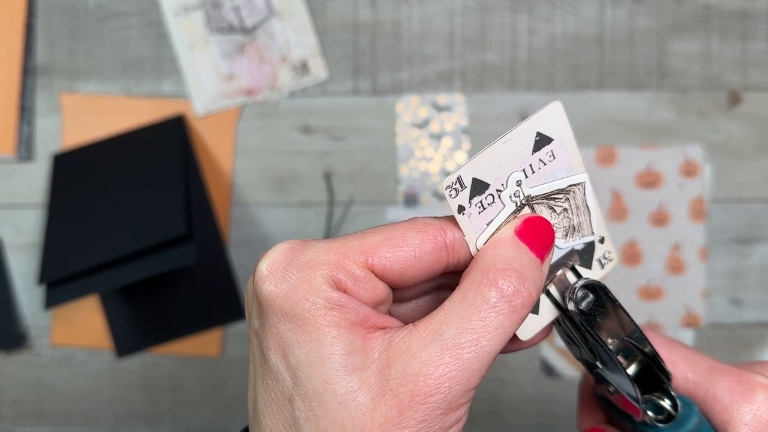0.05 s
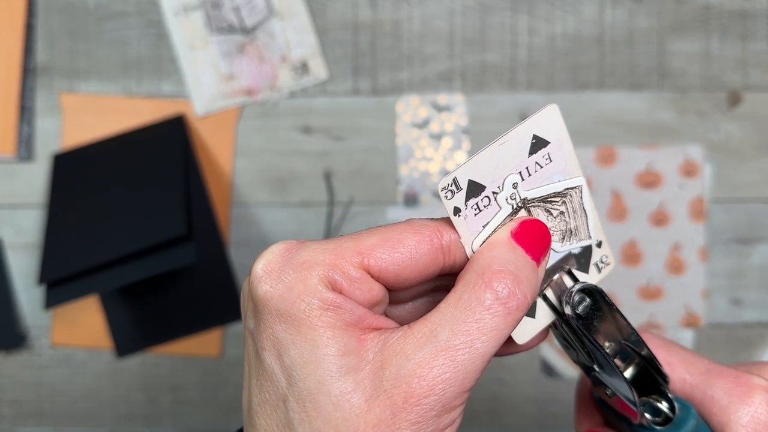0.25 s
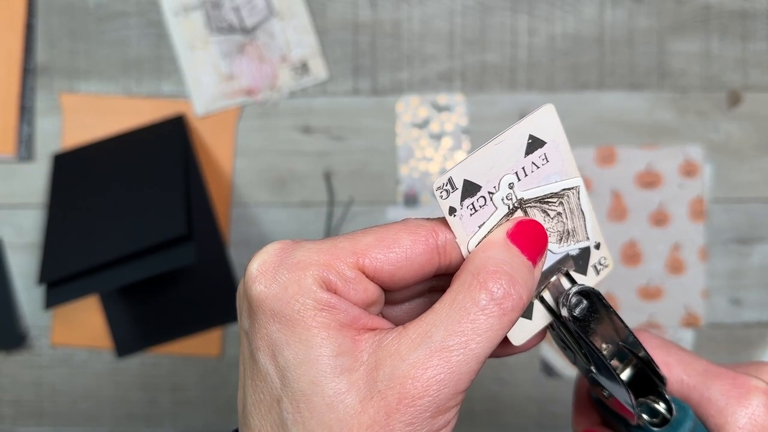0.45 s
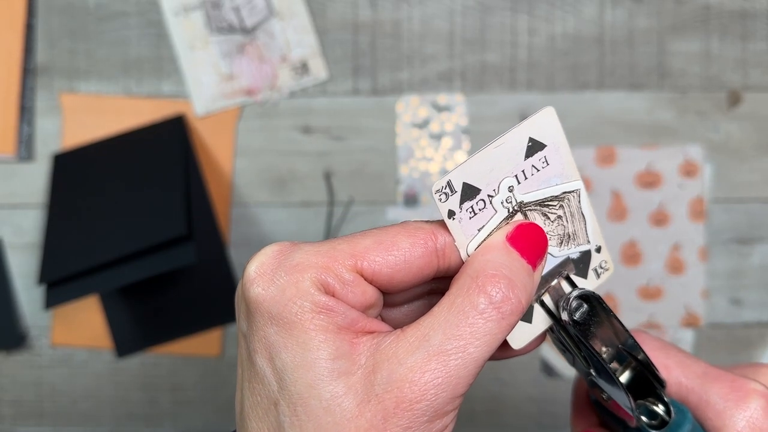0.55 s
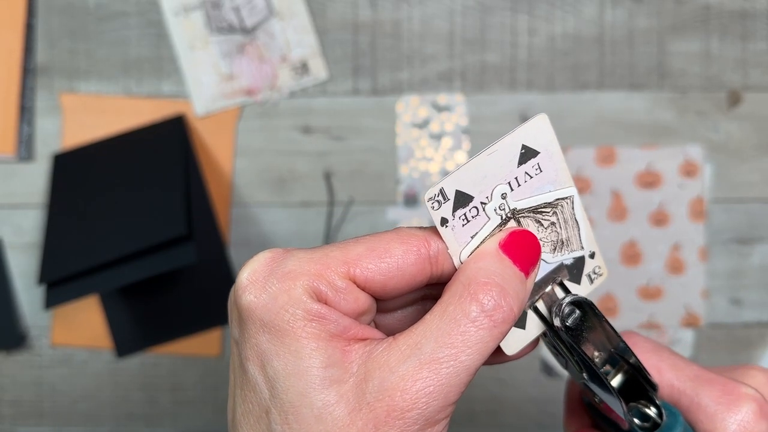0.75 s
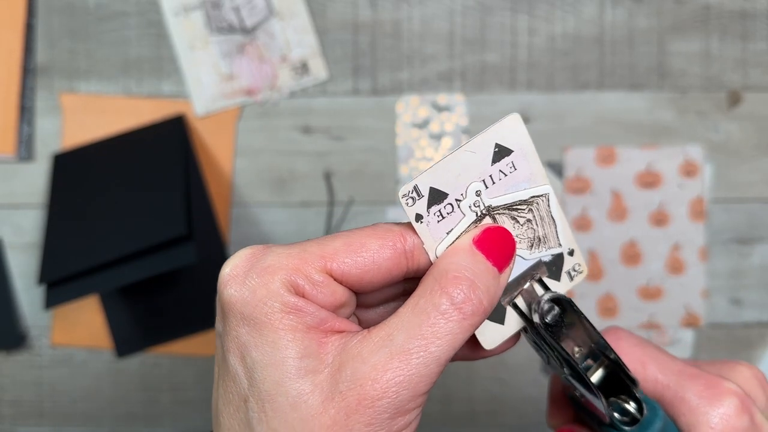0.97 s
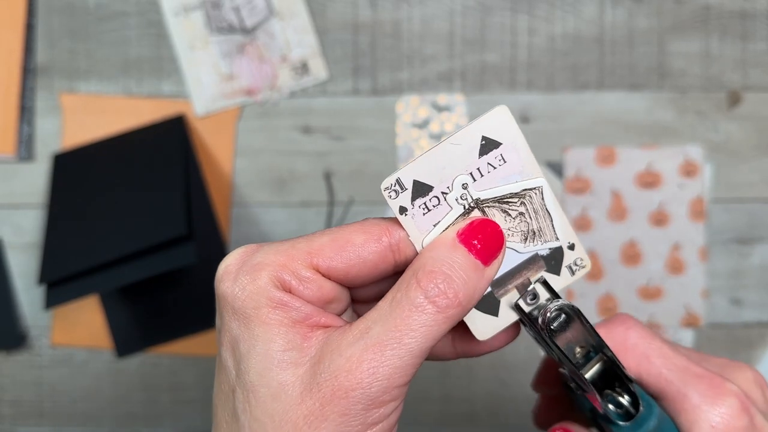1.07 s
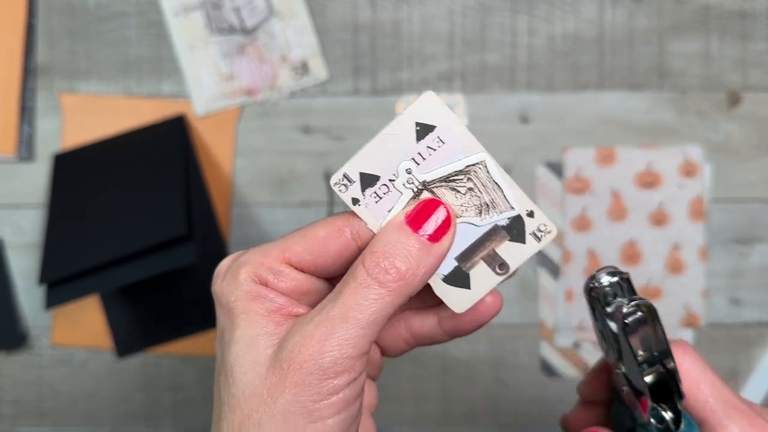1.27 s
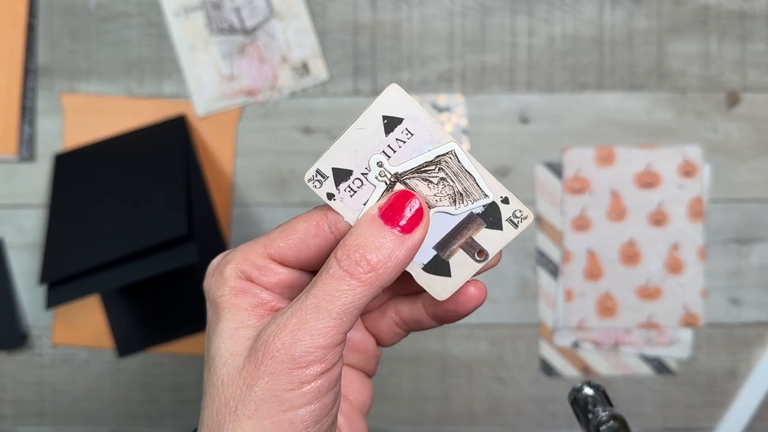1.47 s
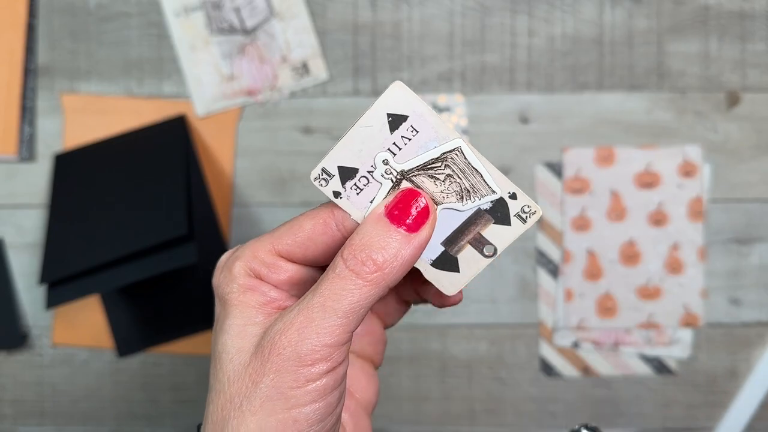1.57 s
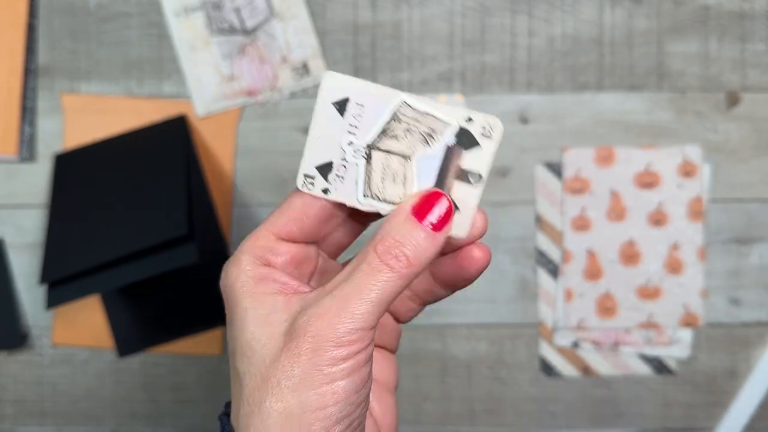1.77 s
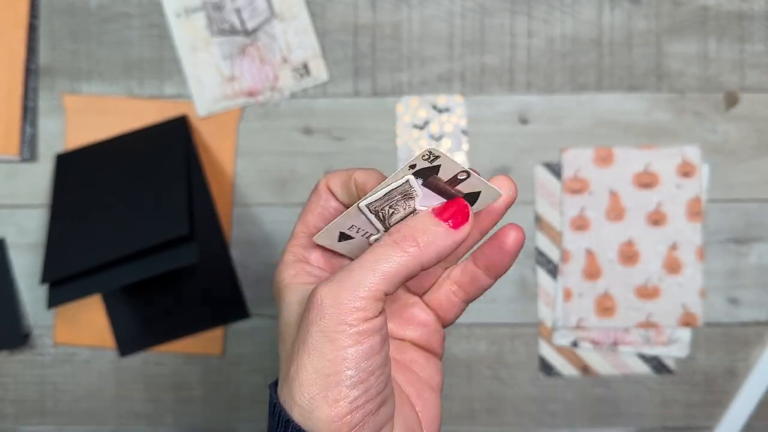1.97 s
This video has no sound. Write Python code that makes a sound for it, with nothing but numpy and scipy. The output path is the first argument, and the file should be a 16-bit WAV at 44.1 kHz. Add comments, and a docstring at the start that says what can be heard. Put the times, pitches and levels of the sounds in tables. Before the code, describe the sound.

A low rumble and a faint hum run throughout in a small, quiet room, and all the action is close to the microphone. At about 0.5 and 0.7 seconds a plier-type steel hole punch ticks faintly as it is squeezed on a card tag. Near 0.8 seconds the card cracks and the pin snaps home in one sharp click, by far the loudest sound, with a very short steel ring and a dull thump in the handles. Around 1.0 second the pin creaks briefly out of the hole, ending in a lighter click. A short, soft, ringing hiss swells into the metallic click of the levers opening at 1.2 seconds and stops just after it, followed by a light tap on the card. From about 1.7 to 2.0 seconds, fingers turn the tag with a few soft taps and papery rubs.

```python
"""A low rumble and a faint hum fill a small, quiet room. Above a craft table a plier-type steel hole
punch ticks as it is squeezed on a card tag. Near 0.8 s the card cracks and the pin snaps into the die,
ringing the steel and thumping the handles. Near 1 s the pin creaks back out of the hole. A soft, ringing
hiss swells into the click of the opening levers at 1.2 s and stops just after it. Last, the fingers turn
the tag with soft rubs and taps."""
import sys
import numpy as np
from scipy import signal
from scipy.fft import rfft, irfft, next_fast_len
from scipy.io import wavfile

SR = 44100
rng = np.random.default_rng(int(sys.argv[2]) if len(sys.argv) > 2 else 0)


def materialize(psi):
    """Save the field psi as 16-bit PCM at rate SR to the path in sys.argv[1].

    A 1-D psi becomes a single channel; in a 2-D psi each row is a channel.
    """
    bounded = np.clip(np.atleast_2d(psi).T, -1, 1)
    quanta = np.round(bounded * 32767).astype(np.int16)
    wavfile.write(sys.argv[1], SR, quanta)


N = 89170
T = np.arange(N) / SR
FREQUENCIES = np.arange(N // 2 + 1) * SR / N


def from_db(db):
    """The decibel scale: 20 dB is a tenfold amplitude."""
    return 10 ** (np.asarray(db) / 20)


def at_hz(points, hz):
    """Interpolation of a table along a logarithmic frequency axis."""
    knots, values = np.transpose(points)
    return np.interp(np.log(np.maximum(hz, 1)), np.log(knots), values)


def colour(x, spectrum, keep_power=True):
    """Minimum-phase filtering: the spectrum is shaped, and no sound precedes its cause."""
    size = 2 * next_fast_len(N)
    gain = from_db(at_hz(spectrum, np.arange(size // 2 + 1) * SR / size))
    if keep_power:
        gain = gain / np.sqrt(np.mean(gain ** 2))
    cepstrum = irfft(np.log(gain))
    cepstrum[1:size // 2] *= 2   # folding onto positive time makes the filter causal
    cepstrum[size // 2 + 1:] = 0
    return irfft(rfft(x, size) * np.exp(rfft(cepstrum)))[..., :N]


def band(x, low_hz, high_hz):
    """Band-limited radiation: a body sounds mainly within its own range."""
    return signal.sosfilt(signal.butter(2, [low_hz, high_hz], "band", fs=SR, output="sos"), x)


def stereo_noise(coherence):
    """Partial coherence: common and opposed white noise mix to make two sides alike by 0 to 1."""
    mid, side = rfft(rng.standard_normal((2, N)))
    common = np.sqrt((1 + coherence) / 2) * mid
    opposed = np.sqrt((1 - coherence) / 2) * side * [[1], [-1]]
    return irfft(common + opposed, N)


def strike(times, levels_db, modes, contact_s):
    """Modal superposition: each blow starts damped sinusoids, which build slowly if contact is soft."""
    impulses, age = np.zeros(N), T[:N // 4]
    np.add.at(impulses, np.round(times * SR).astype(int), from_db(levels_db))
    ring = sum(from_db(db) * np.exp(-np.log(1000) * age / t60) * np.sin(2 * np.pi * hz * age)
               for hz, db, t60 in modes)
    return signal.fftconvolve(impulses, ring * (1 - np.exp(-age / contact_s)))[:N]


def grainy_noise(swells, spectrum, attack_s, grain_db, grain_s):
    """Amplitude modulation: noise in uneven grains swells, holds and dies away."""
    envelope = np.zeros(N)
    for start, hold, db, release in swells:
        rise = np.exp(-np.maximum(start - T, 0) / attack_s)
        decay = np.exp(-np.maximum(T - start - hold, 0) / release)
        envelope += from_db(db) * rise * decay
    flicker = np.interp(T / grain_s, np.arange(N), rng.standard_normal(N))
    grains = from_db(grain_db * np.clip(flicker, -2, 2)) * rng.standard_normal(N)
    return colour(envelope * grains / np.std(grains), spectrum)


def background(rumble_db=-49.5, hiss_db=-68.5, left_bias_db=2.3):
    """The noise floor: room rumble, hum and microphone hiss add, coherent mainly in the bass."""
    # Noise spectra. Each row: frequency in Hz, relative density in dB.
    rumble_spectrum = [(20, -22), (35, -23.5), (55, 0.5), (80, 1), (120, -3), (170, -4), (205, -11.5),
                       (250, -11), (300, -19.5), (400, -16.5), (650, -25), (1100, -26.5), (2000, -41),
                       (3500, -69)]
    hiss_spectrum = [(1500, -25), (2600, -4.5), (4400, 0.5), (7600, 1), (8200, -6), (9000, -24),
                     (12500, -24.5), (14000, -30)]
    # Hum partials. Each row: frequency in Hz, level in dB before panning.
    partials = [(118.4, -60.5), (177.6, -57.5)]
    # Likeness of left and right. Each row: frequency in Hz, coherence from 0 to 1.
    likeness = [(60, 1), (250, 0.8), (1000, 0), (3000, 0), (8000, 0.07)]
    coherence = at_hz(likeness, FREQUENCIES)
    rumble = from_db(rumble_db) * colour(stereo_noise(coherence), rumble_spectrum)
    hum = sum(np.sqrt(2) * from_db(db) * np.sin(2 * np.pi * (hz * T + rng.random()))
              for hz, db in partials)
    hiss = from_db(hiss_db) * colour(stereo_noise(coherence), hiss_spectrum)
    pan = from_db([[left_bias_db / 2], [-left_bias_db / 2]])
    return pan * (rumble + hum) + hiss


def room(x, onset_s=0.00096, near_fade_s=0.018, coherence=.2):
    """Reverberation: the table and near things scatter first; a diffuse tail decays band by band."""
    # Reflected spectrum. Each row: frequency in Hz, gain in dB.
    spectrum = [(150, -26), (400, -21.5), (1200, -14), (2400, -11.5), (3500, -10.5), (5000, -8),
                (8000, -18), (12000, -21), (16000, -23.5)]
    # Reverberation times. Each row: frequency in Hz, T60 in seconds.
    decay_times = [(200, 0.19), (1500, 0.38), (4500, 0.39), (9000, 0.27), (15000, 0.26)]
    noise, tail = rfft(stereo_noise(coherence)), np.zeros((2, N))
    edges = np.geomspace(100, 18000, 9)
    for low, high in zip(edges, edges[1:]):
        fade = at_hz(decay_times, np.sqrt(low * high)) / np.log(1000)
        part = irfft(noise * ((FREQUENCIES >= low) & (FREQUENCIES < high)), N)
        tail += part * np.exp(-T / fade) * np.sqrt(2 / (fade * SR))   # same energy whatever the decay
    near = stereo_noise(coherence) * np.exp(-T / near_fade_s) * np.sqrt(2 / (near_fade_s * SR))
    onset = np.clip(2 * T / onset_s - 1, 0, 1)
    response = onset * colour(tail + near, spectrum, keep_power=False)
    return signal.fftconvolve(x[None], response, axes=-1)[:, :N]


def ports(x):
    """Near-field pickup: direct sound reaches two microphone ports with unequal level and phase."""
    # Balance. Each row: frequency in Hz, level of left over right in dB.
    balance = [(300, 0), (600, 2), (1200, -4.5), (2000, -3.5), (3000, -4.5), (3900, 1.5), (5800, -3.5),
               (7200, -2.5), (8400, 5), (9500, -1), (15000, 1)]
    # Phase. Each row: frequency in Hz, lead of left over right in radians.
    lead = [(300, 1.7), (1400, -0.34), (2700, 1.7), (4500, 1.1), (5600, 2.5), (6500, 1.7), (7800, 2),
            (9000, 1.5), (12000, 0.22), (15500, -1.1)]
    half = from_db(at_hz(balance, FREQUENCIES) / 2) * np.exp(.5j * at_hz(lead, FREQUENCIES))
    return irfft(rfft(x) * np.array([half, 1 / half]), N)


def ringing_hiss():
    """Resonant noise: a soft, ringing hiss swells into the lever click and stops just after it."""
    # The swell. Each row: start of hold in seconds, hold in seconds, level in dB, release in seconds.
    swells = [(1.190, 0.0474, -49.5, 0.0025)]
    # Its peaked spectrum. Each row: frequency in Hz, relative level in dB.
    spectrum = [(300, -19), (1200, -9), (2400, 2.5), (3300, -11.5), (4500, 3), (5400, -8), (6300, 3),
                (7400, -16), (9400, -15.5), (11000, -6), (12500, -14), (16000, -27)]
    return grainy_noise(swells, spectrum, attack_s=0.0194, grain_db=3.0, grain_s=0.0011)


def tag_friction():
    """Stick-slip friction: paper fibres catch and slip, creaking on the pin and rubbing on the fingers."""
    # Strokes. Each row: start of hold in seconds, hold in seconds, level in dB, release in seconds.
    pulls = [(0.9855, .0165, -41, .0022), (1.015, 0.0093, -43.5, .0025)]
    rubs = [(0.657, 0.0089, -66, 0.02), (1.735, 0.038, -65.5, .012), (1.787, 0.037, -49, 0.01),
            (1.873, .008, -61, 0.022), (1.934, .010, -59.5, 0.029)]
    # Their spectra. Each row: frequency in Hz, relative level in dB.
    creak_spectrum = [(300, -14.5), (1200, -6), (1900, -8), (2800, -2), (3700, -2), (4600, -3.5),
                      (6000, -13.5), (8400, 6.5), (9200, -7), (10000, -6), (13000, -14), (16000, -21)]
    rub_spectrum = [(400, -12.5), (1200, -2), (2600, 1), (4500, 2), (6700, 4.5), (8300, 3), (11000, 5.5),
                    (13000, -0.5), (15500, 1.5), (16500, -27.5)]
    creak = grainy_noise(pulls, creak_spectrum, attack_s=.0014, grain_db=6.0, grain_s=.0004)
    rub = grainy_noise(rubs, rub_spectrum, attack_s=.007, grain_db=3.0, grain_s=0.00074)
    return creak + rub


def handle_thump(times, levels_db):
    """Damping: the hand absorbs the low modes of the handles, leaving a dull knock."""
    # Handle modes. Each row: frequency in Hz, relative level in dB, T60 in seconds.
    modes = [(168, -26, 0.045), (365, 0, 0.042), (412, -6.5, 0.083), (490, -3, 0.028)]
    return band(strike(times, levels_db, modes, contact_s=0.00026), low_hz=131.4, high_hz=553)


def tag_taps(thump_offset_db=-8):
    """Flexural vibration: each tap rings the tag briefly and also thumps the hand."""
    # Taps. Each row: time in seconds, strength in dB.
    taps = [(0.7027, -39.5), (1.2373, -36.5), (1.6718, -45), (1.7869, -48), (1.814, -41)]
    # Modes of the free tag. Each row: frequency in Hz, relative level in dB, T60 in seconds.
    modes = [(1167.4, -7.5, 0.014), (1600, -6, .015), (2150, -3.5, 0.013), (2599, -8, 0.015),
             (3080, -7, .018), (5040, -3, 0.0037), (9500, 2.5, .002), (14000, -3.5, 0.0022)]
    times, db = np.transpose(taps)
    return strike(times, db, modes, contact_s=0.00028) + handle_thump(times, db + thump_offset_db)


def card_knock(times, levels_db):
    """A clamped plate: the stiff card rings while the jaws hold it."""
    # Modes of the held card. Each row: frequency in Hz, relative level in dB, T60 in seconds.
    modes = [(1056, -3.5, 0.021), (1159, -8, 0.05), (1247, -0.5, 0.014), (1450, -14, 0.0099),
             (2165, -24, 0.018), (2700, -33.5, .02)]
    return band(strike(times, levels_db, modes, contact_s=0.0004), low_hz=970, high_hz=1900)


def steel_ring(times, die_db, lever_db, lever_lag_s=0.0):
    """Free vibration of struck steel: the small pin and die ring high, the levers lower."""
    # Steel modes. Each row: frequency in Hz, relative level in dB, T60 in seconds.
    die_modes = [(6075, -20, .025), (6950, 3, 0.027), (7950, -0.5, .025), (8740, -6.5, 0.03),
                 (9340, -1, 0.013), (9900, -12.5, 0.021), (10650, -17.5, .03), (11170, -10.5, 0.031),
                 (12800, -15.5, 0.023), (15200, -20, .025)]
    lever_modes = [(3134, -11, 0.03), (3590, -14.5, 0.035), (3950, -17.5, 0.017), (4313, -1, 0.013),
                   (4423, 2.5, 0.015), (4880, -10, 0.028), (5852, -6.5, 0.027)]
    die = strike(times, die_db, die_modes, contact_s=.00025)
    levers = strike(times + lever_lag_s, lever_db, lever_modes, contact_s=.0004)
    return die + levers


def cracks(times, levels_db, fades, rise_s=0.00038, snap_db=6.0):
    """Broadband transients: one sharp snap inside each burst of breaking fibres and chattering steel."""
    # Crack spectrum. Each row: frequency in Hz, relative level in dB.
    spectrum = [(300, -41.5), (1200, -12), (2300, -10.5), (3700, -5), (4500, 0.5), (5400, 1.5), (7000, 3),
                (9500, 1.5), (12000, -1.5), (15300, -6.5), (16500, -39)]
    power, snaps = np.zeros(N), np.zeros(N)
    for start, db, fade in zip(times, levels_db, fades):
        age = np.maximum(T - start, 0)
        rise = 1 - np.exp(-(age / rise_s) ** 2)
        power += (from_db(db) * rise * np.exp(-age / fade)) ** 2
        snaps[round((start + rise_s) * SR)] += from_db(db + snap_db)
    bursts = np.sqrt(power) * rng.choice([-1, 1], N)
    return colour(snaps + bursts, spectrum)


def touches(tick_fade_s=0.0016):
    """Weak impacts: light steel ticks and soft card knocks sound around the blows."""
    # The pin ticks in its guide; the jaws nudge the card. Each row: time in seconds, strength in dB.
    ticks = [(0.4958, -52), (0.67, -56.5), (0.702, -60), (0.988, -38)]
    nudges = [(0.704, -40.5), (0.976, -50.5), (1.0111, -39.5), (1.1120, -50), (1.213, -41)]
    times, db = np.transpose(ticks)
    clicks = cracks(times, db, np.full(len(times), tick_fade_s))
    steel = steel_ring(times, die_db=db - 5, lever_db=db - 4)
    return clicks + steel + card_knock(*np.transpose(nudges))


def punch(lever_lag_s=.0006, card_lag_s=.0013, handle_lag_s=.002):
    """Structure-borne sound: each blow cracks and rings the die, then reaches levers, card and handles."""
    # The card cracks, the pin snaps home, it springs back, the levers open. Each row: time in seconds,
    # crack strength in dB, crack fade in seconds, then strengths in dB at die, levers, card and handles.
    blows = [(0.7863, -18, .0014, -29, -35, -17.5, -28), (0.7923, -4.5, .001, -20.5, -22, -35.5, -19.5),
             (1.0209, -25, 0.0016, -45, -26, -37.5, -36), (1.2070, -24, 0.0024, -44, -25, -48.5, -55)]
    times, crack_db, fades, die_db, lever_db, card_db, handle_db = np.transpose(blows)
    crack = cracks(times, crack_db, fades)
    steel = steel_ring(times, die_db, lever_db, lever_lag_s)
    card = card_knock(times + card_lag_s, card_db)
    handles = handle_thump(times + handle_lag_s, handle_db)
    return crack + card + handles, steel


def scene(steel_room_db=-15.5):
    """Direct and reverberant fields add; the steel ring of the blows sends less into the room."""
    knocks, steel = punch()
    close_sound = knocks + touches() + tag_friction() + ringing_hiss() + tag_taps()
    direct = ports(close_sound + steel)
    reverberant = room(close_sound + from_db(steel_room_db) * steel)
    return direct + reverberant + background()


def record(dry, cutoff_hz=16300):
    """Band limiting: a steep elliptic low-pass removes the highest treble."""
    return signal.sosfilt(signal.ellip(10, .2, 80, cutoff_hz, fs=SR, output="sos"), dry)


dry = scene()
out = record(dry)
materialize(out)
```